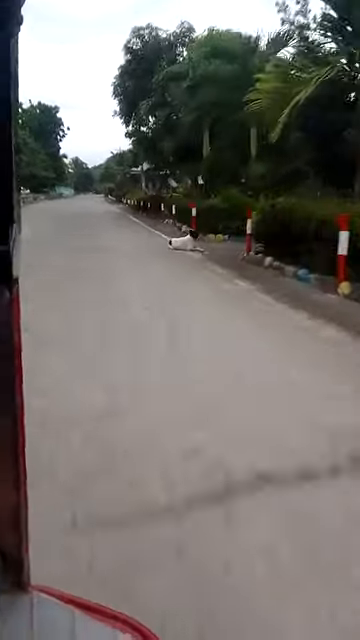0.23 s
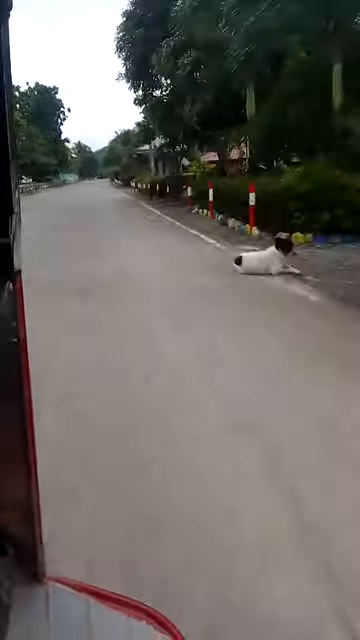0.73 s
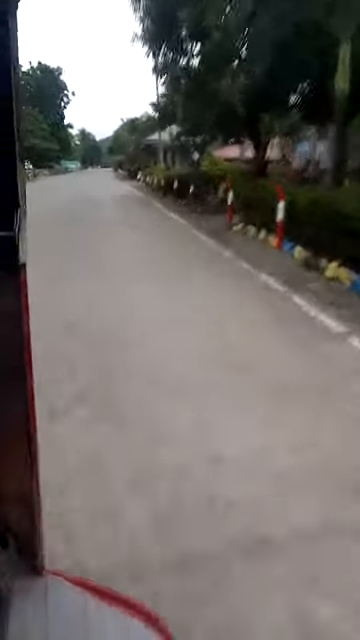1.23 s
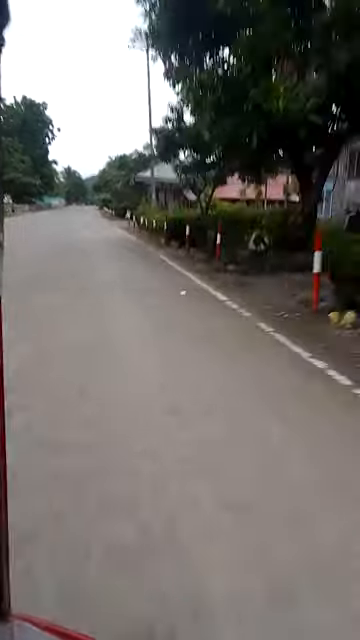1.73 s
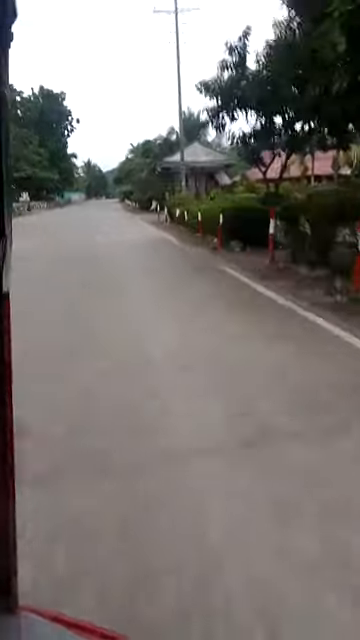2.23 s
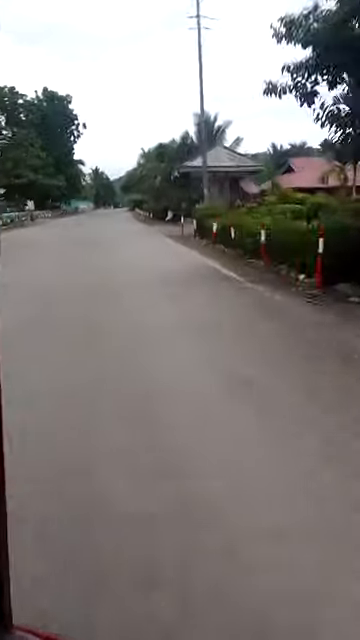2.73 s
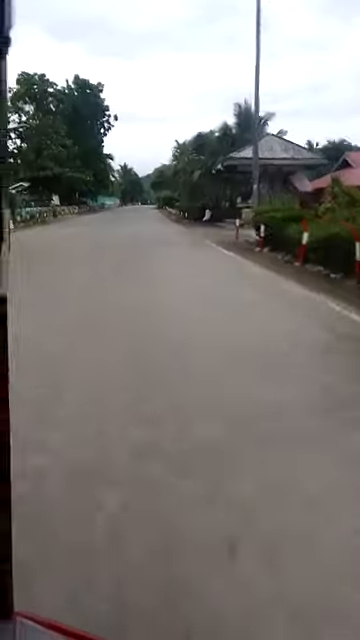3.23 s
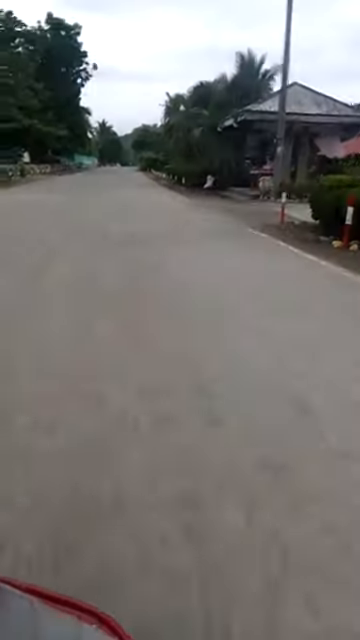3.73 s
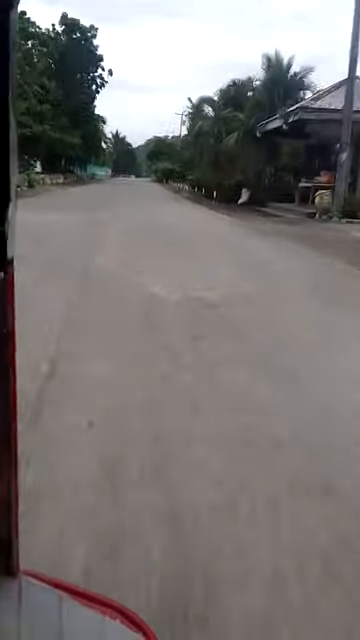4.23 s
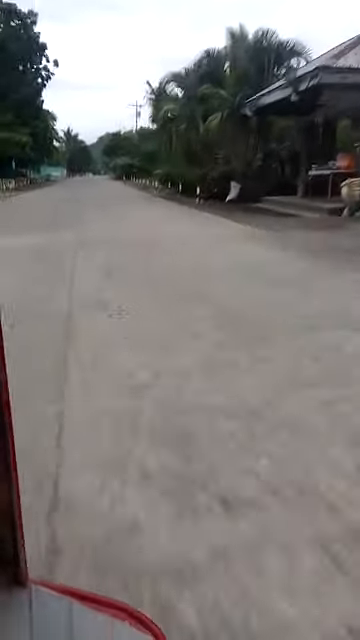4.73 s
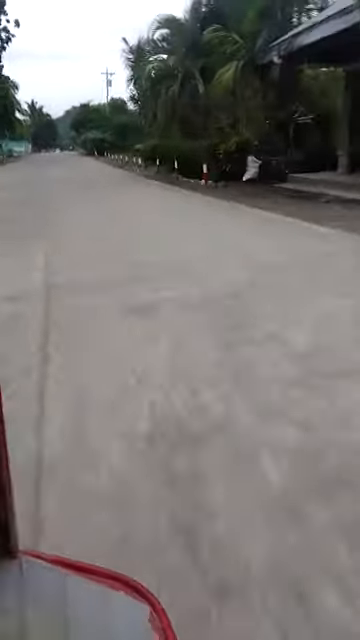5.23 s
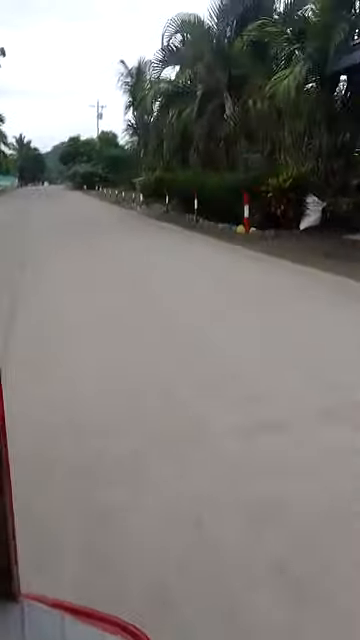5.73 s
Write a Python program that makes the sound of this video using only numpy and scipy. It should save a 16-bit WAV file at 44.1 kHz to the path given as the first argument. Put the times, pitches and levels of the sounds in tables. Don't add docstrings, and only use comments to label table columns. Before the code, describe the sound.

A close, rough handheld capture of a ride outdoors: quick even engine putter, buzzing tin bodywork, low tyre drone and airy hiss. Irregular bumps set off dry knocks, panel slaps and bright metallic ticks throughout. Gusts flutter and thump the microphone, and the level surges around two and four seconds. A few thin bird whistles pass at mid-ride; the engine quickens very slightly towards the end.

```python
import sys
import numpy as np
from scipy import signal
from scipy.io import wavfile

SR = 44100
rng = np.random.default_rng(int(sys.argv[2]) if len(sys.argv) > 2 else 0)


def unload_wav(signal):
    wavfile.write(
        sys.argv[1],
        SR,
        np.round(np.clip(np.atleast_2d(signal).T, -1, 1) * 32767).astype(np.int16),
    )


def how_loud(loudness_db):
    steps = np.asarray(loudness_db, float) / 20
    return 10 ** steps


N = 263718

# (time [s], engine level [dB])
RIDE = [(0, -27.5), (.27, -33), (.75, -33), (.85, -29.5), (1.4, -30.5), (1.68, -34), (1.97, -33.5),
        (2.16, -24), (2.28, -27.5), (2.5, -27.5), (3.03, -30), (3.3, -34), (3.62, -34.5), (3.88, -22.5),
        (4.12, -28), (4.8, -29.5), (5.65, -29), (5.98, -31.5)]
MEAN_RIDE_DB = -30

# (frequency [Hz], level [dB per Hz])
HISS_COLOUR = [(350, -1.5), (600, -1.5), (900, -8), (1500, -7), (2200, -10.5), (3000, -18), (4200, -21),
               (5500, -19.5), (7900, -22), (8900, -21), (10000, -82), (11500, -40), (14300, -24.5),
               (17500, -39)]
HISS_DB, HISS_FOLLOWS = -41, 0.75

# (peak time [s], rumble level [dB], buffeting level [dB])
GUSTS = [(0, -5.5, -12), (.12, -16, -11), (.27, -18, -10), (.65, -27, -18), (1.04, -26, -18),
         (1.25, -36, -25), (1.4, -29, -22), (1.56, -29, -23.5), (1.8, -27, -24), (2.11, -19, -16),
         (2.25, -22, -18.5), (2.48, -26, -22), (2.75, -24, -25), (2.93, -17.5, -26), (3.1, -37, -38),
         (3.38, -28, -19.5), (3.76, -23, -21), (3.95, -31, -13), (4.1, -12, -21), (4.35, -34, -19),
         (4.55, -17, -20), (4.75, -27, -17.5), (4.98, -30, -12.5), (5.36, -23, -16.5), (5.46, -22, -30),
         (5.63, -25, -14), (5.71, -35, -17.5), (5.96, -20, -23)]
# (frequency [Hz], level [dB per Hz])
RUMBLE_COLOUR = [(14, -9), (22, 6.5), (40, 5), (60, 3), (85, -6.5), (140, -26)]
# (frequency [Hz], level [dB per Hz])
BUFFET_COLOUR = [(50, -17.5), (85, 0), (120, 2), (230, -6.5), (350, -7), (500, -20), (700, -27.5),
                 (1000, -59)]
RUMBLE_DB_PER_S, BUFFET_DB_PER_S = 191, 102
RUMBLE_LULL_DB, BUFFET_LULL_DB = -34, -20

# (centre time [s], peak [dB], frequency [Hz], half length [s])
THUMPS = [(.053, -12, 140, .01), (.2585, -4, 210, .004), (.265, -12, 600, .0015), (2.17, -10, 150, .012),
          (3.86, -14, 95, .012), (4.345, -13, 150, .01), (5.133, -13, 87, .01), (5.61, -14, 170, .012),
          (5.7115, -3.5, 130, .006), (5.71, -14, 500, .002), (5.458, -10, 70, .008)]

# (time [s], length [s], start pitch [Hz], end pitch [Hz], level [dB])
CHIRPS = [
    (2.43, .038, 7880, 7780, -38),
    (2.634, .034, 7750, 7420, -36),
    (2.66, .018, 7900, 8700, -48),
    (2.674, .034, 8750, 8250, -46),
    (2.768, .038, 7750, 7280, -38),
    (2.555, .022, 5900, 5950, -44),
]

# (frequency [Hz], level [dB], time to fall by 60 dB [s])
PANEL_TONES = [(1590, 5, .06), (2000, -3, .03), (2280, -4, .03), (2620, -6, .025), (3000, -7, .025),
               (4000, -9, .02), (5330, -5, .03), (5850, -4, .03), (6300, -9, .025), (7070, -9, .025),
               (7570, -9, .025), (8330, -8, .025)]
# (frequency [Hz], level [dB], time to fall by 60 dB [s])
FITTING_TONES = [(7980, 0, .035), (10320, -24, .04), (12240, -17, .03), (12890, -19, .03),
                 (14920, -20, .03)]
# (frequency [Hz], level [dB per Hz])
KNOCK_COLOUR = [(700, -10), (1200, 9), (2000, 6.5), (2800, 7), (4000, -16.5), (6000, -4.5), (8200, -9),
                (9300, -46), (10500, -34), (13500, -15), (15200, -13), (17500, -20)]
# (time [s], peak [dB], low panel over the peak [dB])
BOOMS = [(.1511, -23, 1), (0.84, -21, 3.5), (1.7708, -18.5, 5), (1.8763, -20, 5.5), (2.361, -17.5, 6),
         (2.557, -30, 1), (2.587, -21, 4), (3.4501, -33, 8), (3.7743, -18.5, 7), (4.0143, -28, 9),
         (5.011, -18, 5.5), (5.1973, -19.5, 0), (5.3886, -16, 3.5), (5.6386, -20, 6.5)]
BOOM_FITTING_DB, BOOM_TOP_DB = -23, -30
# (time [s], peak [dB], fitting over the peak [dB], top over the peak [dB])
TINKLES = [(0.569, -25.5, 3.5, -15), (.63, -23, -4, -14), (0.8996, -18.5, 2, -23), (0.977, -32, 2, -18),
           (1.1606, -23, 1, -15), (1.3553, -24, 4.5, -15), (1.399, -22.5, 3, -28), (1.445, -21.5, 2.5, -12),
           (1.5424, -20.5, -4, -15), (2.044, -21, -2, -19), (2.2393, -22, 0.5, -20),
           (3.123, -13.5, -2, -24), (3.2176, -45, -9, -18), (3.245, -19.5, 5, -15), (3.6643, -26, 2, -12),
           (4.563, -24, 0, -18), (5.1628, -18, -7, -23)]
TINKLE_LOW_DB = 0
# (time [s], peak [dB], top over the peak [dB])
SLAPS = [(.0787, -27, -24), (0.95, -24, -24), (1.527, -22, -21), (2.7062, -19.5, -24), (5.917, -23, -24),
         (.4427, -18, -22), (0.65, -23.5, -12), (.7951, -23.5, -27), (1.33, -17.5, -21), (1.49, -17, -26),
         (1.5968, -25, -17), (1.724, -20, -23), (1.921, -18.5, -35), (2.0068, -22, -22), (2.148, -31, -27),
         (2.5087, -17.5, -15), (3.089, -22.5, -29), (3.314, -23, -26), (3.586, -24, -26),
         (3.8656, -17, -27), (3.926, -27, -22), (4.1595, -17.5, -19), (4.422, -19.5, -31),
         (4.5301, -23, -24), (4.8005, -34, -27), (4.9866, -26, -13), (5.426, -19.5, -17),
         (5.5952, -15, -24), (5.7897, -20, -23), (5.824, -15.5, -25)]
SLAP_LOW_DB, SLAP_FITTING_DB = -3, -20

TYRE_HZ, TYRE_DB = 91.5, 3.8

# (time [s], firing rate [Hz])
FIRING = [(0.0, 24.742), (0.5, 24.521), (1.0, 24.631), (1.5, 24.705), (2.0, 24.686), (2.6, 24.721),
          (3.2, 24.698), (3.7, 24.962), (4.1, 25.116), (4.6, 25.245), (5.1, 25.363), (5.5, 25.371),
          (5.98, 25.328)]
FIRST_TURN = .708
# (frequency [Hz], width [Hz], level [dB])
BODY_TONES = [(925, 165, -4), (1129, 136, 3.5), (1317, 165, 0.5), (1224, 31, -3.5), (1642, 80, -14),
              (1759.4, 23, 2), (1834, 54, -3.5), (2684, 143, -13), (3563, 140, -17.5)]
# (frequency [Hz], width [Hz], level [dB])
EXHAUST_TONES = [(130, 22, 0), (207, 36, -2), (373, 11, -13), (471, 13, -21)]
EXHAUST_DB, EXHAUST_DB_PER_HZ, CRUISE_HZ = 4.0, 2.0, 24.7
REBOUND_S, REBOUND_DB = .0085, -6

# (frequency [Hz], width [Hz], amount taken away [dB])
MIC_DIP = [(9470, 3270, -2)]


def rms_one(x):
    return x / np.sqrt(np.mean(x ** 2) + 1e-20)


def in_time(rows):
    s, *columns = np.transpose(rows)
    return [np.interp(np.arange(N) / SR, s, c) for c in columns]


def drift(rate):
    r = np.exp(-80 * np.pi * rate / SR)
    white = rng.standard_normal(N // 40 + 2002)
    slow = signal.lfilter([1], [1, -2 * r, r * r], white)[2000:]
    return np.interp(np.arange(N) / 40, np.arange(len(slow)), rms_one(slow))


def cut(x, hz, kind, order=2):
    return signal.sosfilt(signal.butter(order, hz, kind, fs=SR, output="sos"), x)


def resonate(x, modes):
    out = 0
    for k, (hz, width, db) in enumerate(modes):
        r = np.exp(-np.pi * width / SR)
        top = (1 - r * r) / 2 * np.array([1, 0, -1])
        bottom = [1, -2 * r * np.cos(2 * np.pi * hz / SR), r * r]
        out = out + (-1) ** k * how_loud(db) * signal.lfilter(top, bottom, x)
    return out


def ring(clicks, hz, t60):
    r = how_loud(-60 / (t60 * SR))
    w = 2 * np.pi * hz / SR
    return signal.lfilter([0, np.sin(w)], [1, -2 * r * np.cos(w), r * r], clicks + 1e-18)


def banded_noise(spectrum, patchy_db, together_db, rate, count):
    hz_points, db_points = np.transpose(spectrum)
    out, together = 0, drift(rate)
    white = rng.standard_normal((2, N))
    edges = np.geomspace(hz_points[0], hz_points[-1], count + 1)
    for k, (low, high) in enumerate(zip(edges, edges[1:])):
        level_db = np.interp(np.log(low * high) / 2, np.log(hz_points), db_points)
        flicker_db = together_db * together + patchy_db * drift(rate)
        out = out + how_loud(level_db + flicker_db) * cut(white[k % 2], [low, high], "band")
    return rms_one(out)


def road_hiss(hiss_db):
    return how_loud(hiss_db + 9) * banded_noise(HISS_COLOUR, patchy_db=1.44, together_db=1.6, rate=21, count=20)


def gusting(peaks_db, db_per_s, lull_db):
    t = np.arange(0, N + 64, 64) / SR
    away_s = abs(t - np.array(GUSTS)[:, :1])
    gusts = how_loud(peaks_db[:, None] - db_per_s * away_s).max(axis=0)
    return np.hypot(np.interp(np.arange(N) / SR, t, gusts), how_loud(lull_db))


def wind(swing_db):
    _, rumble_db, buffet_db = np.transpose(GUSTS)
    rumble = gusting(rumble_db, RUMBLE_DB_PER_S, RUMBLE_LULL_DB + swing_db)
    rumble *= banded_noise(RUMBLE_COLOUR, patchy_db=2.0, together_db=1.5, rate=21, count=9)
    buffet = gusting(buffet_db, BUFFET_DB_PER_S, BUFFET_LULL_DB + swing_db)
    buffet *= banded_noise(BUFFET_COLOUR, patchy_db=1.0, together_db=0.5, rate=8.3, count=12)
    return (rumble + how_loud(-4.5) * buffet) * how_loud(1.5 * drift(14))


def thumps():
    t, out = np.arange(N) / SR, np.zeros(N)
    for s, db, hz, length_s in THUMPS:
        swell = np.exp(-((t - s) / length_s) ** 2)
        out -= how_loud(db) * swell * np.sin(2 * np.pi * hz * (t - s))
    return out


def bird():
    t, out = np.arange(N) / SR, np.zeros(N)
    for s, length, start_hz, end_hz, db in CHIRPS:
        part = np.clip((t - s) / length, 0, 1)
        pitch = end_hz + (start_hz - end_hz) * (1 - part) ** 1.5
        out += how_loud(db) * np.sin(np.pi * part) * np.sin(2 * np.pi * np.cumsum(pitch) / SR)
    hoarse = out * how_loud(3.5 * drift(150))
    return hoarse + how_loud(-14) * np.roll(hoarse, int(.018 * SR))


def every_rattle():
    booms = [(s, db, low_db, BOOM_FITTING_DB, BOOM_TOP_DB) for s, db, low_db in BOOMS]
    tinkles = [(s, db, TINKLE_LOW_DB, ring_db, top_db) for s, db, ring_db, top_db in TINKLES]
    slaps = [(s, db, SLAP_LOW_DB, SLAP_FITTING_DB, top_db) for s, db, top_db in SLAPS]
    return np.array(booms + tinkles + slaps)


def rattles(bounce_s, bounces_per_s):
    rows = every_rattle()
    at, out = (rows[:, 0] * SR).astype(int), np.zeros(N)
    after = np.arange(int(4 * bounce_s * SR))
    size = (len(at), len(after))
    contact = rng.random(size) < bounces_per_s / SR
    contact[:, 0] = True
    tones = [(tone, 2 if tone[0] < 2500 else None, -19.5) for tone in PANEL_TONES]
    tones += [(tone, 3 if tone[0] < 9000 else 4, -5.0 if k == 0 else 13.0)
              for k, tone in enumerate(FITTING_TONES)]
    for (hz, db, t60), column, offset_db in tones:
        level_db = rows[:, 1] + db + offset_db + 2.5 * rng.standard_normal(len(at))
        if column:
            level_db += rows[:, column]
        runs = contact * rng.standard_normal(size) * np.exp(-after / SR / bounce_s)
        clicks = np.zeros(N + 3000)
        np.add.at(clicks, at[:, None] + after, how_loud(level_db)[:, None] * runs)
        out += ring(clicks[:N], hz, t60)
    return out


def knocks(hold_s, fade_s, low_db, top_db, chatter_db):
    rows = every_rattle()
    after = np.arange(3000) / SR
    shape = np.minimum(1, np.exp((hold_s - after) / fade_s))
    noise = banded_noise(KNOCK_COLOUR, patchy_db=3.0, together_db=0.0, rate=28, count=14)
    low, middle = cut(noise, 2500, "low"), cut(noise, [2500, 9500], "band")
    top = cut(noise, 10500, "high", order=4)
    touch = rng.random(N) < 25 * how_loud(4.0 * drift(3)) / SR
    taps = touch * how_loud(chatter_db + 2.0 * rng.standard_normal(N))
    out = np.zeros(N)
    for part, over_db in [(low, rows[:, 2] + low_db), (middle, 0), (top, rows[:, 4] + top_db)]:
        blows = taps.copy()
        blows[(rows[:, 0] * SR).astype(int)] = how_loud(rows[:, 1] + over_db)
        out += part * signal.fftconvolve(blows, shape)[:N]
    return out


def jingle(per_s, spread_db):
    touch = rng.random(N) < per_s * how_loud(3.0 * drift(8)) / SR
    clicks = touch * how_loud(spread_db * rng.standard_normal(N))
    out = np.zeros(N)
    for hz, db, t60 in FITTING_TONES:
        out += how_loud(db) * ring(clicks * rng.standard_normal(N), hz, t60)
    return rms_one(out)


def loose_parts(hiss_db):
    out = how_loud(-11) * rattles(bounce_s=.01, bounces_per_s=1800)
    out += how_loud(hiss_db - 15) * jingle(per_s=70, spread_db=2.5)
    return out + how_loud(-5.0) * knocks(hold_s=0.0045, fade_s=0.0099, low_db=0.5, top_db=19.0, chatter_db=-49)


def tyre_hum():
    hum = rms_one(resonate(rng.standard_normal(N), [(TYRE_HZ, 11, -1)]))
    return how_loud(TYRE_DB - 1.5 + 1.5 * drift(6)) * hum


def cycles():
    return FIRST_TURN + np.cumsum(in_time(FIRING)[0]) / SR


def clatter(turns, firing_db, stroke_db, flicker_db):
    throb_db = firing_db * np.cos(2 * np.pi * (turns - .15))
    throb_db += stroke_db * np.cos(2 * np.pi * (4 * turns - .3))
    shaking = rng.standard_normal(N) * how_loud(throb_db + flicker_db * drift(38))
    return rms_one(resonate(shaking, BODY_TONES))


def exhaust(turns, uneven_db, late_s, soft_hz, open_end_hz):
    at = np.flatnonzero(np.diff(np.floor(turns)))
    chance = rng.standard_normal((len(at), 2))
    late = (late_s * SR * chance[:, 0]).astype(int)
    pulses = np.zeros(N)
    pulses[np.clip(at + late, 0, N - 1)] = how_loud(uneven_db * chance[:, 1])
    pulses += how_loud(REBOUND_DB) * np.roll(pulses, int(REBOUND_S * SR))
    soft = cut(pulses, soft_hz, "low")
    leaving = cut(soft, open_end_hz, "high")
    return -rms_one(resonate(leaving, EXHAUST_TONES))


def engine():
    turns = cycles()
    pipe_db = EXHAUST_DB + EXHAUST_DB_PER_HZ * (in_time(FIRING)[0] - CRUISE_HZ)
    pipe = exhaust(turns, uneven_db=2.0, late_s=.0002, soft_hz=580, open_end_hz=136)
    tin = clatter(turns, firing_db=0.55, stroke_db=-0.4, flicker_db=0.5)
    return how_loud(pipe_db) * pipe + how_loud(1.0) * tin


def scene():
    level_db, = in_time(RIDE)
    swing_db = level_db - MEAN_RIDE_DB
    hiss_db = HISS_DB + HISS_FOLLOWS * swing_db
    surroundings = road_hiss(hiss_db) + wind(swing_db) + thumps() + how_loud(7.0) * bird()
    vehicle = loose_parts(hiss_db) + how_loud(level_db) * (tyre_hum() + engine())
    return (surroundings + vehicle)[None]


def band_limit(x):
    return signal.sosfilt(signal.butter(12, 16180, fs=SR, output="sos"), x)


def record(dry):
    coloured = cut(dry - resonate(dry, MIC_DIP), 24, "high")
    rounded = 0.9 * np.tanh(coloured / 0.89)
    top_cut = signal.ellip(10, .5, 60, 15750, fs=SR, output="sos")
    mix = signal.sosfilt(top_cut, rounded) + .0026
    return band_limit(mix)


dry = scene()
out = record(dry)
unload_wav(out)
```